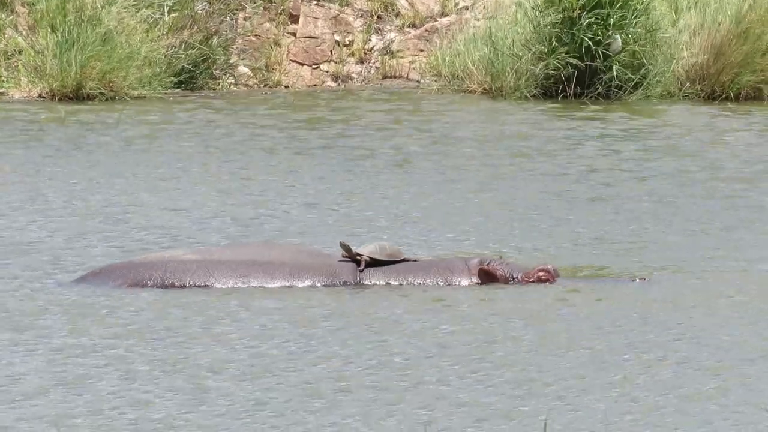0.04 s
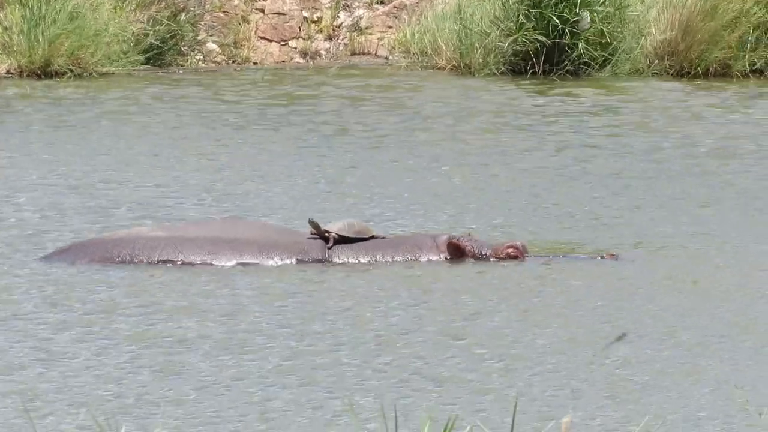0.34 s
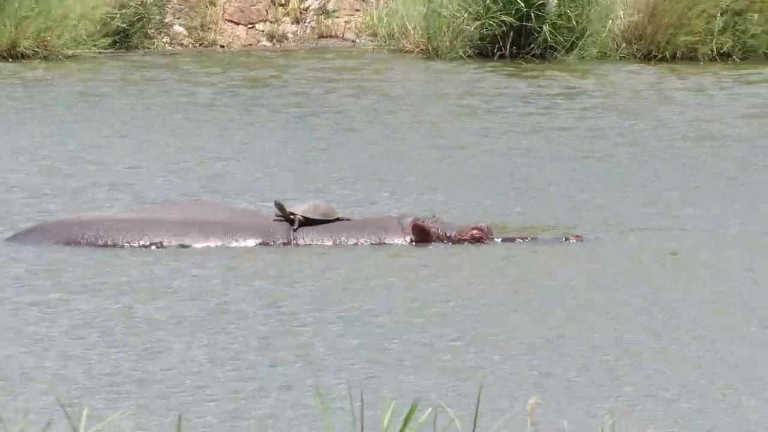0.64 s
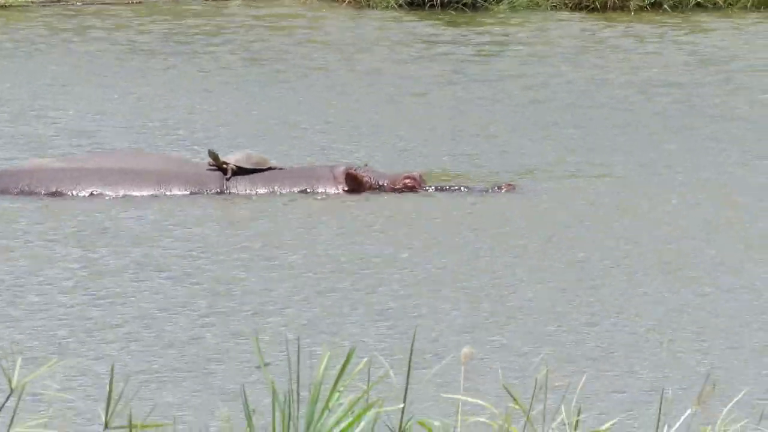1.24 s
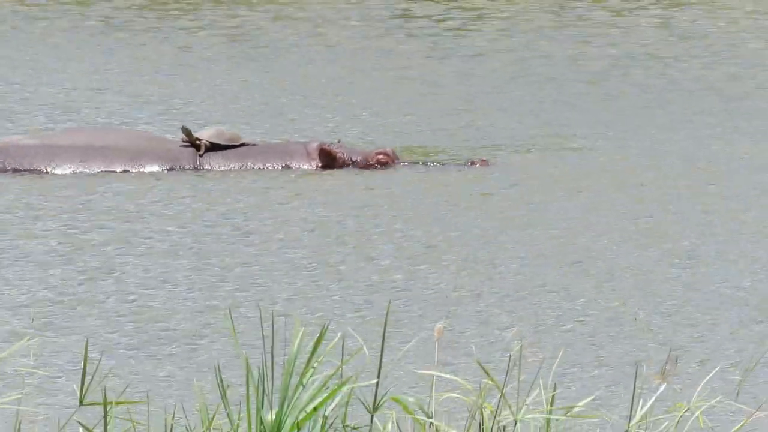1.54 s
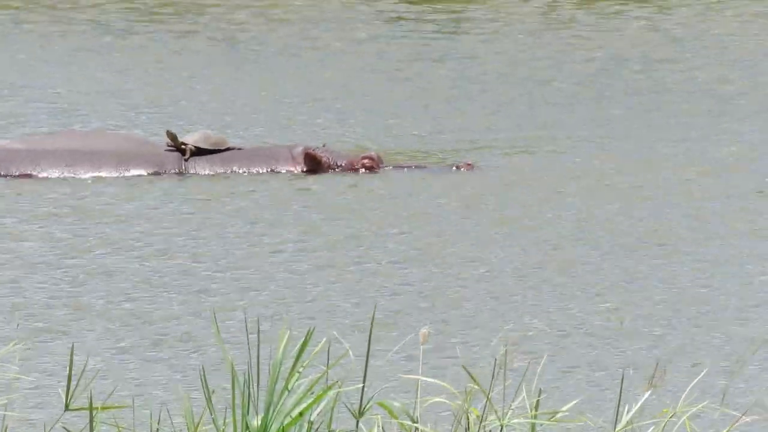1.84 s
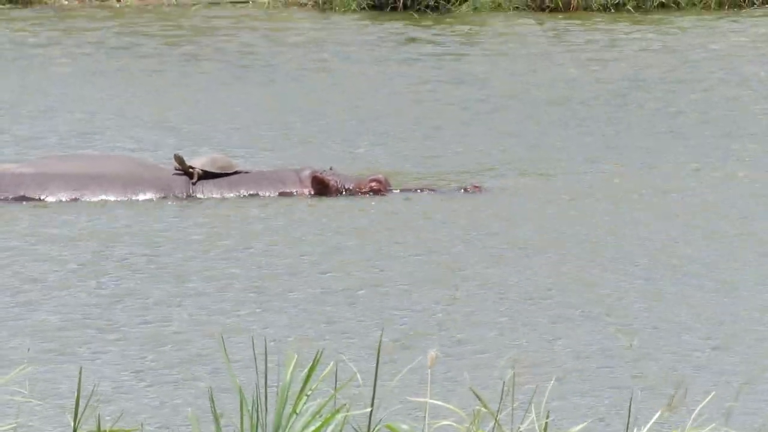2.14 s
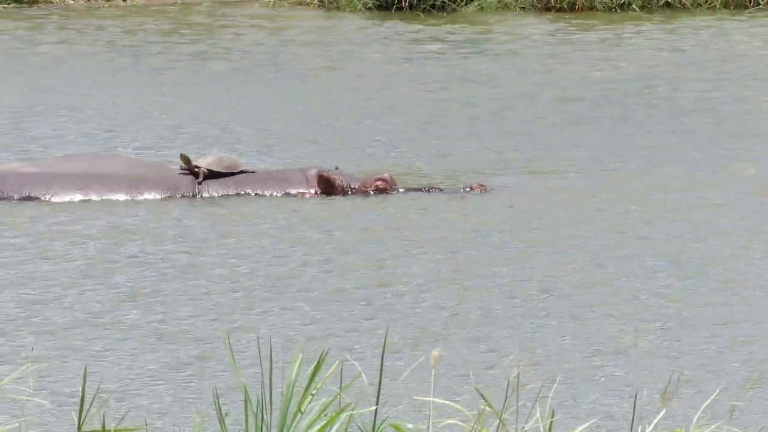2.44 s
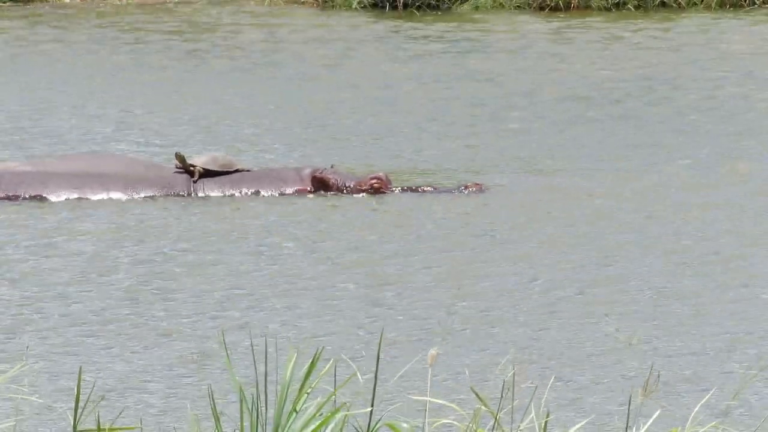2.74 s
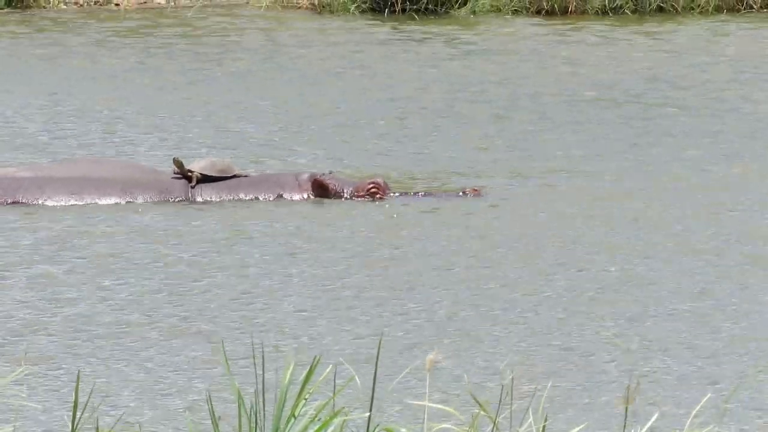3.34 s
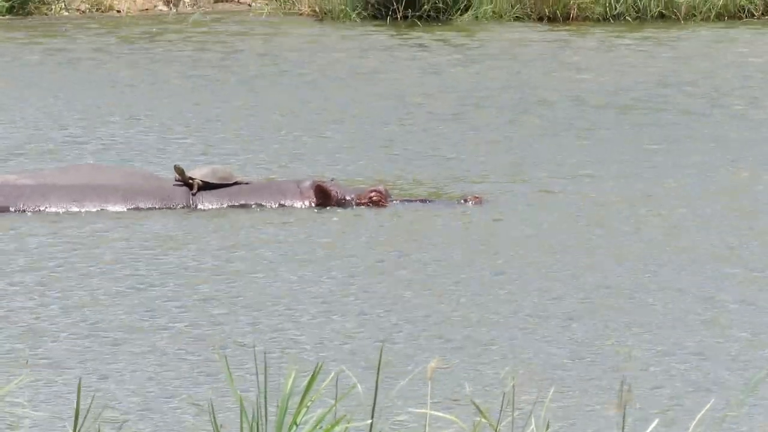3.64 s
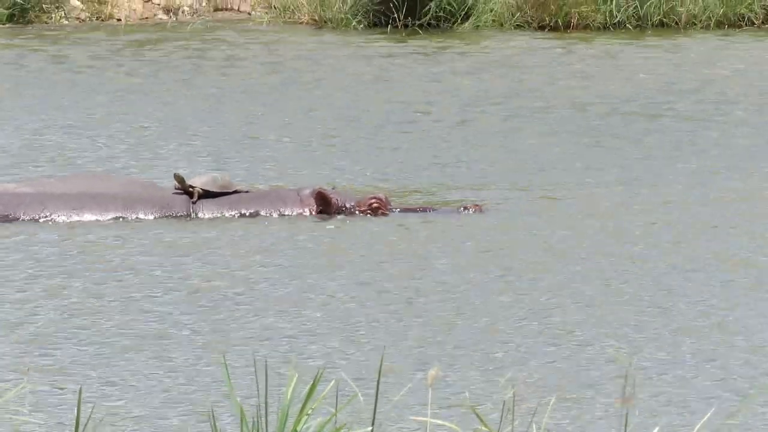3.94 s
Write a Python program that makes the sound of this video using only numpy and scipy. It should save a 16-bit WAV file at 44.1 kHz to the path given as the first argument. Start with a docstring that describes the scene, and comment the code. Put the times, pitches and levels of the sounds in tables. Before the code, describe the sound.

Wind blows across a microphone beside open water, with two brief low gusts, then a calmer stretch. Thumping gusts come back and build toward the end, while reeds hiss softly and faint birds chirp far away.

```python
"""Wind at an open waterhole, on a small stereo camera microphone standing in the wind.
Air rushes over water and reeds throughout. At once hiss swells and a gust rumbles on the two ports;
grass brushes, a weaker gust passes, and a hollow hum comes and goes in the lull. From 2.3 s, after a tick,
gusts return and eddies thump across the ports, mostly from the right, over faint ticks and far chirps.
From 3 s the reeds rustle under the strongest buffeting, which peaks just before the end."""
import sys
import numpy as np
from scipy import signal
from scipy.fft import rfft, irfft
from scipy.io import wavfile
from scipy.ndimage import uniform_filter1d

SR = 44100
rng = np.random.default_rng(int(sys.argv[2]) if len(sys.argv) > 2 else 0)


def to_wav(sig):
    """Store sig (one row per channel, or 1-D mono) as 16-bit WAV at the path in sys.argv[1].

    Samples outside -1..1 are clipped; the rate is SR.
    """
    pcm = np.clip(np.atleast_2d(sig), -1, 1) * 32767
    pcm = np.round(pcm).astype(np.int16)
    wavfile.write(sys.argv[1], SR, pcm.T)  # frames by channels


N = 176400
AIR_LAG_MS = 0.027  # the surrounding wind reaches the left port this much later


def undb(db):
    """Decibels to gain."""
    return 10 ** (np.asarray(db) / 20)


def unit(x):
    """Scale to rms 1."""
    return x / np.sqrt(np.mean(x ** 2))


def bins():
    """Frequencies of the spectrum, Hz."""
    return np.maximum(np.arange(N // 2 + 1) * SR / N, 1)


def curve(points, hz):
    """Read (frequency, value) points on a log axis."""
    freqs, values = np.array(points, float).T
    return np.interp(np.log(hz), np.log(freqs), values)


def walk(rate_hz):
    """Random levels held 1 / rate_hz s and smoothed twice; rms 1."""
    hold = int(SR / rate_hz)
    steps = np.repeat(rng.standard_normal(N // hold + 1), hold)
    return unit(uniform_filter1d(uniform_filter1d(steps, hold), hold)[:N])


def port_noise(gain, likeness, lag_ms=AIR_LAG_MS):
    """Coloured noise at the two microphone ports: a shared part, late on the left, and a part each."""
    shared, left, right = rfft(rng.standard_normal((3, N)))
    delay = np.exp(-2j * np.pi * bins() * lag_ms / 1000)
    common = np.sqrt(likeness) * np.array([shared * delay, shared])
    separate = np.sqrt(1 - likeness) * np.array([left, right])
    return unit(irfft(gain * (common + separate), N))


def flicker(x, depth_db, rate_hz):
    """Each half-octave band wavers by itself; rms 1."""
    half_octaves = 2 * np.log2(np.clip(bins() / 20, 1, 2 ** 10))
    spectrum = rfft(x)
    bands = (irfft(spectrum * np.maximum(1 - abs(half_octaves - k), 0), N) for k in range(21))
    return unit(sum(band * undb(depth_db * walk(rate_hz)) for band in bands))


def swell(t, start, hold, attack_s, release_s):
    """Smooth rise up to start, hold, exponential fall."""
    rise = (np.minimum(t - start, 0) / attack_s) ** 2
    fall = np.maximum(t - start - hold, 0) / release_s
    return np.exp(-rise - fall)


def swells(t, rows, attack_s, release_s):
    """Summed gain of several swells."""
    return sum(undb(db) * swell(t, start, hold, attack_s, release_s) for start, hold, db in rows)


# Rush of the open air: freq_hz, density_db
AIR_SPECTRUM = [(13, -70), (22, -47), (43, -20.5), (86, -14.5), (106, -14.5), (150, -4.5), (191, -2.5),
                (278, -7.5), (318, -7), (500, -9.5), (542, -12.5), (671, -13.5), (767, -12), (1850, -19.5),
                (2290, -24.5), (3420, -27), (13000, -45.5)]
# How alike the two ports hear it: freq_hz, likeness_0_to_1
AIR_PORT_LIKENESS = [(60, 1), (200, 1), (400, 0.82), (700, 0.7), (1400, 0.74), (3000, 0.53), (6500, 0),
                     (12000, 0.7)]


def open_air():
    """Steady rush of wind over the water and banks, all around the microphone."""
    rush = port_noise(undb(curve(AIR_SPECTRUM, bins())), curve(AIR_PORT_LIKENESS, bins()))
    level_db = -46 + 0.57 * walk(rate_hz=22.1)
    return undb(level_db) * flicker(rush, depth_db=0.92, rate_hz=20)


# Freshening wind in the reeds: start_s, hold_s, level_db
HISS_SWELLS = [(-.05, 0.24, -65), (.28, 0.19, -63.5), (.79, 0.1, -63.5), (2.2, 0.21, -65.5),
               (3.1, 0.63, -64)]
# Colour of the hiss: freq_hz, density_db
HISS_SPECTRUM = [(1500, -28), (2800, 2.5), (4000, 2.5), (6000, -4), (9000, -3.5), (12000, -6), (13500, -9),
                 (15500, -32)]
REED_ATTACK_S, REED_RELEASE_S = 0.034, 0.045


def reed_hiss(t):
    """The reeds at the waterhole hiss as the wind freshens."""
    hiss = port_noise(undb(curve(HISS_SPECTRUM, bins())), likeness=0.57)
    return hiss * swells(t, HISS_SWELLS, REED_ATTACK_S, REED_RELEASE_S)


def port_filter():
    """The ports pass turbulence between a low cut and a steep upper edge."""
    low_hz, high_hz = 67.5, 523
    return 1 / np.sqrt((1 + (bins() / high_hz) ** 16) * (1 + (low_hz / bins()) ** 4))


# Gusts on the microphone: start_s, hold_s, level_db, eddy_rate_hz, direction (0 head-on, 1 right)
PORT_GUSTS = [(0.04, 0.085, -40, 202, 0.085), (0.764, 0.045, -51, 80, 0.18), (0.825, 0.046, -37.5, 109, 0),
              (2.309, 0.06, -48.5, 119, 0.44), (2.366, 0.6, -41, 136, 0.41),
              (2.481, 0.193, -39.5, 222, 0.42), (2.986, 0.15, -46.5, 110, 0.44),
              (3.228, 0.36, -35, 134.5, 0.39), (3.32, 0.124, -36.5, 217, 1), (3.643, 0.12, -35, 150, 0.32),
              (3.747, 0.096, -33, 232, 0.52), (3.871, 0.042, -45.5, 109, 0)]
# Turbulence in a gust: eddy_rate_multiple, density_db
GUST_SPECTRUM = [(.1, -46), (.2, -28), (.45, 1), (.8, 3.5), (1.3, -2.5), (2.2, -10), (3.4, -15.5), (6, -22)]


def gusts(t):
    """Fluttering turbulence right on the ports; faster eddies give a higher rumble."""
    crossing_ms, flutter_db = 1.32, 3
    out = 0
    for start, hold, db, hz, direction in PORT_GUSTS:
        colour = undb(curve(GUST_SPECTRUM, bins() / hz)) * port_filter()
        rumble = port_noise(colour, likeness=0.94, lag_ms=direction * crossing_ms)
        out += undb(db) * rumble * swell(t, start, hold, attack_s=0.02, release_s=0.0088)
    return out * unit(undb(flutter_db * walk(rate_hz=99.5)))


# Strong eddies arriving at the ports: time_s, level_db, rate_hz, left_lag_ms, left_over_right_db
PORT_EDDIES = [(.047, -23, 179, 0.29, 2), (.089, -17.5, 223, 0.38, 2.5), (.104, -26.5, 238, 0.58, 0),
               (.113, -29, 202, -0.19, 5), (0.145, -28, 179, 0.32, -2), (.196, -29.5, 248, 0.3, 1),
               (0.818, -31.5, 128, 0.43, 8), (0.847, -33, 97, -0.25, -7), (2.376, -23, 133, 1.2, 1),
               (2.396, -30.5, 135, 1.6, 3), (2.418, -25.5, 128, 1.3, 4), (2.477, -22, 214, 0.88, 0),
               (2.504, -20, 197, 0.99, 2), (2.545, -10, 198, 0.91, 2), (2.562, -14.5, 146, 1, 2),
               (2.583, -23, 248, 1.1, -1), (2.617, -13, 257, 1.03, 1), (2.653, -21.5, 232, 1.15, -4),
               (2.67, -24.5, 242, 0.91, 8), (2.689, -21, 306, 1.25, -6.5), (2.778, -27.5, 202, 0.8, 3),
               (2.8, -24.5, 187, 1.2, 2), (2.881, -15, 247, 0.88, 2), (2.912, -23.5, 140, 0.84, 5),
               (3.109, -30, 141, 1.1, 3), (3.229, -23, 174, 1, -3), (3.256, -6.5, 250, 0.86, 2),
               (3.309, -10.5, 206, 0.93, 3), (3.332, -15, 209, 1, 3), (3.357, -20, 200, 0.87, 4),
               (3.379, -22.5, 222, 0.94, -7), (3.396, -30, 174, 1.3, 3), (3.433, -11, 219, 0.94, 5),
               (3.4406, -8, 276, 1.06, 0), (3.447, -18.5, 223, -0.44, 6), (3.455, -23.5, 223, 0.92, -1),
               (3.503, -23, 150, 1.3, 0), (3.531, -20, 194, 1.27, 3), (3.571, -27, 126, 0.74, 8),
               (3.652, -23, 122, 0.83, 7), (3.668, -23, 149, .8, -1), (3.684, -16, 227, 1.07, 5),
               (3.713, -23.5, 222, 1, 3), (3.735, -15.5, 190, 0.043, 3), (3.745, -2, 272, 0.43, -2.5),
               (3.762, -17, 260, .1, 1), (3.771, -20.5, 292, -0.87, 4), (3.787, -20, 220, -.2, -1),
               (3.795, -16.5, 251, -0.11, -3), (3.803, -17, 262, -0.4, -2), (3.823, -29, 216, 0.2, -2),
               (3.835, -22, 296, -0.35, -1)]


def eddies(t):
    """Each eddy is a suction dip between two pressure bumps, crossing one port and then the other."""
    half_width_cycles, skew = 0.38, 0.48  # skew: the rate rises across the eddy
    out = np.zeros((2, N))
    side = np.array([[.5], [-.5]])  # left, right
    phases = rng.uniform(-1.36, 1, len(PORT_EDDIES))
    for (at, db, hz, lag_ms, pan_db), phase in zip(PORT_EDDIES, phases):
        near = abs(t - at) < 0.05
        cycles = (t[near] - at - side * lag_ms / 1000) * hz
        pressure = -np.cos(2 * np.pi * (cycles + skew * cycles * np.tanh(cycles)) + phase)
        envelope = np.exp(-.5 * (cycles / half_width_cycles) ** 2)
        out[:, near] += undb(db + side * pan_db) * pressure * envelope
    return irfft(rfft(out) * port_filter(), N)


# Grass touching in the wind: start_s, hold_s, level_db, centre_hz
GRASS_BRUSHES = [(.33, 0.087, -66, 4240), (2.668, 0.0055, -63, 3700), (2.72, .015, -63.5, 3700)]


def grass(t):
    """Narrow bands of rustle where blades of grass slide past each other."""
    half_width_hz = 380
    out = 0
    for start, hold, db, hz in GRASS_BRUSHES:
        brush = port_noise(1 / (1 + ((bins() - hz) / half_width_hz) ** 2), likeness=1)
        out += undb(db) * brush * swell(t, start, hold, attack_s=0.01, release_s=0.01)
    return out


# Low wind over the waterhole between gusts: start_s, hold_s, level_db
HUM_SWELLS = [(1.06, .1, -46.5), (1.266, 0.3, -51.5), (1.72, .04, -51)]


def wind_hum(t):
    """A soft, hollow hum of wind that comes and goes in the lull."""
    centre_hz, half_width_hz = 186, 53
    hum = port_noise(1 / (1 + ((bins() - centre_hz) / half_width_hz) ** 4), likeness=1)
    return hum * swells(t, HUM_SWELLS, attack_s=0.03, release_s=0.03)


# Close ticks: time_s, ring_db, ring_hz, upper_ring_hz, upper_relative_db, crack_db, decay_s
NEAR_TICKS = [(2.257, -36.5, 970, 1620, -7.5, -38, 0.0054), (2.926, -46, 1420, 1760, -1.5, -51, 0.0081),
              (2.968, -45, 2860, 5480, -10.5, -45, 0.0052), (3.0, -46, 1660, 2610, -0.5, -50, .005),
              (3.897, -39, 774, 1700, -4.5, -47, .0025)]
# Colour of the crack: ring_multiple, density_db
CRACK_SPECTRUM = [(.25, -1), (.5, 5), (1, -5), (1.6, -6), (2.2, -14), (4, -27), (9, -62)]


def ticks(t):
    """Faint dry ticks near the microphone: a sharp crack and two quickly damped rings."""
    out = 0
    for at, ring_db, hz, upper_hz, upper_db, crack_db, decay in NEAR_TICKS:
        rings = np.sin(2 * np.pi * hz * (t - at))
        rings += undb(upper_db) * np.sin(2 * np.pi * upper_hz * (t - at))
        crack = port_noise(undb(curve(CRACK_SPECTRUM, bins() / hz)), likeness=1, lag_ms=0)
        envelope = swell(t, at, hold=0.00092, attack_s=0.00063, release_s=decay)
        out += (undb(ring_db) * rings + undb(crack_db) * crack) * envelope
    return out


# Birds far from the microphone: start_s, length_s, from_hz, middle_hz, to_hz, level_db
FAR_CHIRPS = [(2.728, 0.044, 2780, 2900, 3330, -51.5), (3.234, 0.035, 1960, 1720, 1590, -46),
              (3.651, 0.057, 1350, 1420, 1450, -50), (3.71, 0.035, 1460, 1434, 1400, -48),
              (3.736, 0.032, 1290, 1264, 1240, -50)]


def far_birds(t):
    """Thin gliding chirps from far away, wavering slightly in the wind."""
    waver_depth, flicker_db = 0.008, 2.5
    waver = 1 + waver_depth * walk(rate_hz=500)
    out = 0
    for start, length, from_hz, middle_hz, to_hz, db in FAR_CHIRPS:
        progress = np.clip((t - start) / length, 0, 1)
        pitch_hz = np.interp(progress, [0, .5, 1], [from_hz, middle_hz, to_hz]) * waver
        tone = np.sin(2 * np.pi * np.cumsum(pitch_hz) / SR)
        out += undb(db) * np.sin(np.pi * progress) * tone
    return out * unit(undb(flicker_db * walk(rate_hz=120)))


# Reeds behind the strongest gusts: start_s, hold_s, level_db
RUSTLE_SWELLS = [(2.98, 0.75, -54)]
# Colour of the rustle: freq_hz, density_db
RUSTLE_SPECTRUM = [(500, -35), (900, -1.5), (1500, 5), (2000, -3.5), (3200, -11.5), (6000, -21.5)]


def reed_rustle(t):
    """Stronger wind stirs the reeds into a flickering rustle, lower than their hiss."""
    noise = port_noise(undb(curve(RUSTLE_SPECTRUM, bins())), likeness=0.9)
    rustle = flicker(noise, depth_db=2.5, rate_hz=29.9)
    return rustle * swells(t, RUSTLE_SWELLS, REED_ATTACK_S, REED_RELEASE_S)


def scene():
    """Wind on the microphone in front, the waterhole behind."""
    t = np.arange(N) / SR
    return (open_air() + reed_hiss(t) + gusts(t) + eddies(t) + grass(t)
            + wind_hum(t) + ticks(t) + far_birds(t) + reed_rustle(t))


def record(dry):
    """The camera rolls off the treble and then cuts the top."""
    roll_off_hz, top_hz = 13200, 14800
    soft = irfft(rfft(dry) / np.sqrt(1 + (bins() / roll_off_hz) ** 36), N)
    return signal.sosfilt(signal.ellip(8, .2, 70, top_hz, fs=SR, output="sos"), soft)


dry = scene()
out = record(dry)
to_wav(out)
```